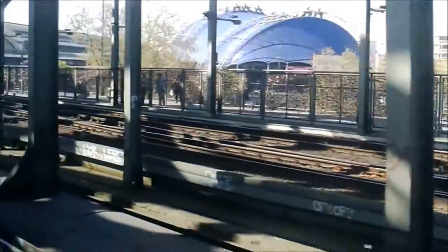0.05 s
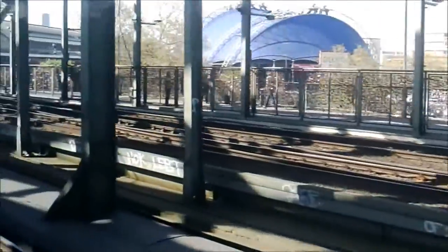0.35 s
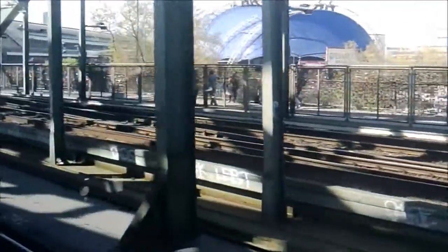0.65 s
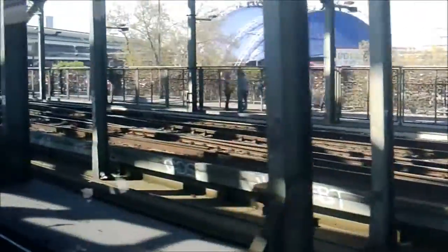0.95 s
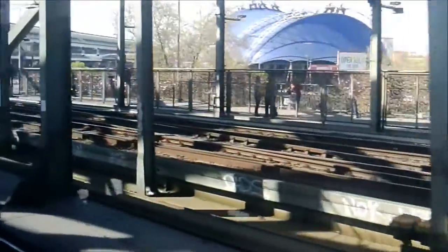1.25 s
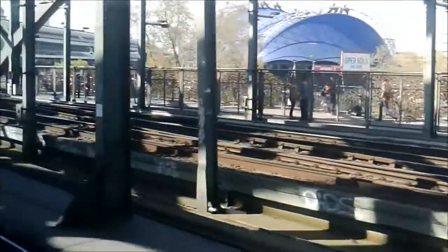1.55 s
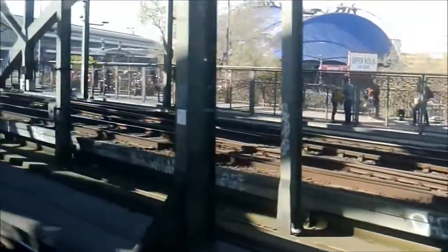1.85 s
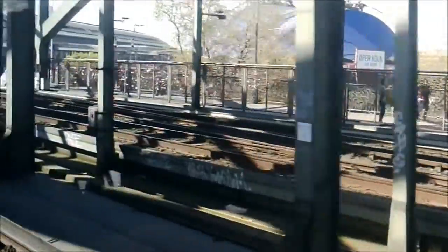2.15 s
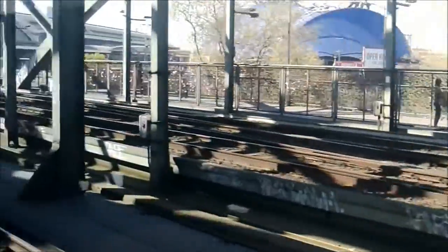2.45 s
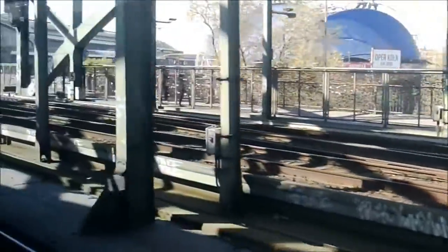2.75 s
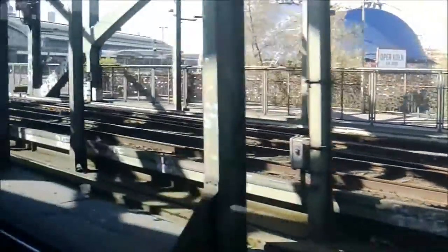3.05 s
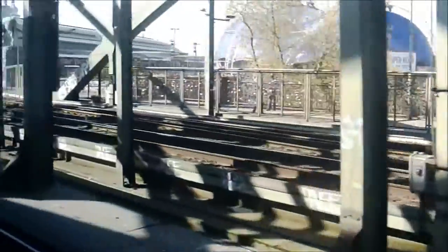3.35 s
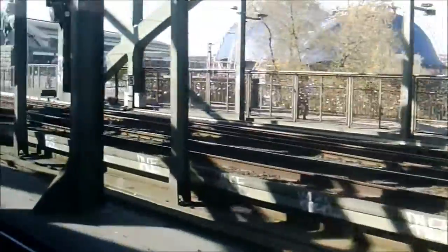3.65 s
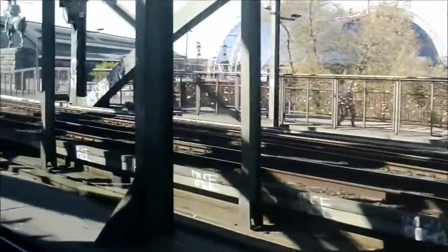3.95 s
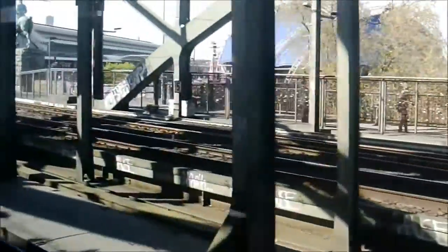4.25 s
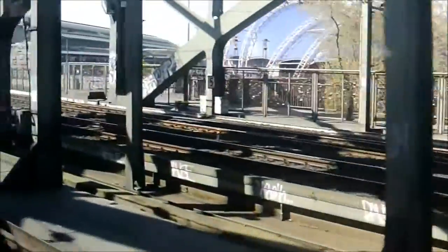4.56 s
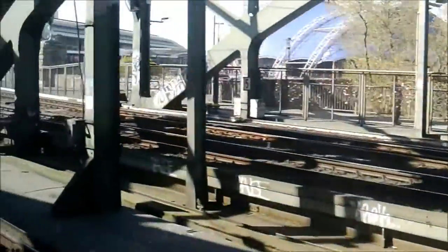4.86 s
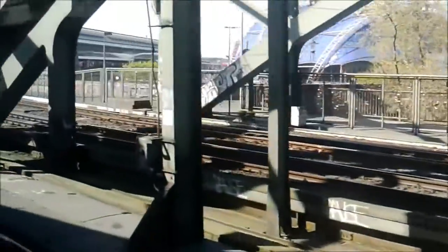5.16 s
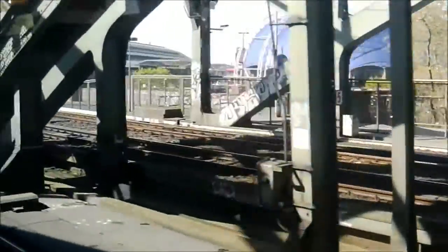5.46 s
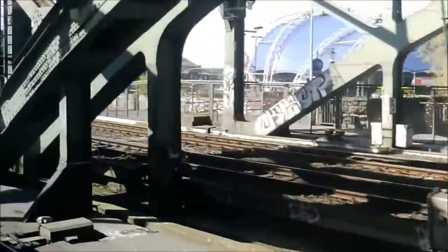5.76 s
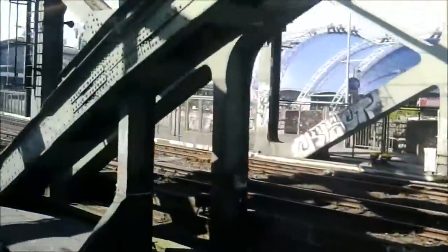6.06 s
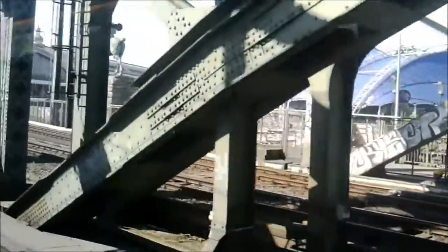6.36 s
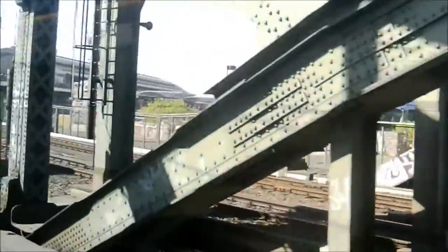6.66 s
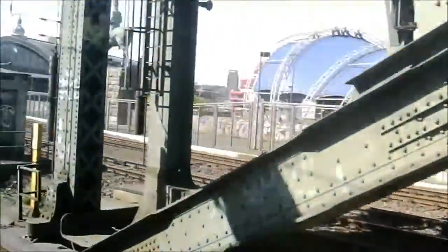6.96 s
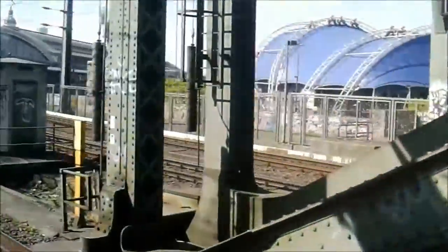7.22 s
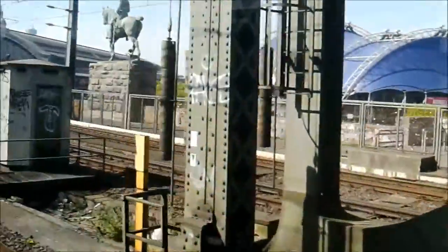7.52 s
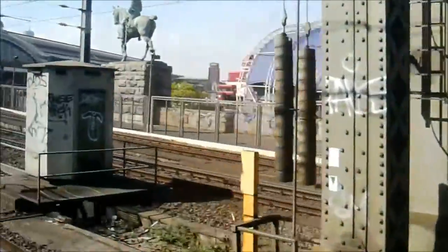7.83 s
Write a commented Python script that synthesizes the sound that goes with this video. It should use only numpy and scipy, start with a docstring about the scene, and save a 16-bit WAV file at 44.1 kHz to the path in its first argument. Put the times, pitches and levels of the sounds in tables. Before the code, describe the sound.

Inside a closed train carriage crossing a steel bridge, wheels rumble and thud under a steady drone, with faint ticks.

```python
"""A train rolls over a steel truss bridge, heard inside a closed carriage. From the start the wheels rumble
through the floor, two machines drone and beat, and thin converter and fan tones sing under a high whine.
From 1.5 s the bogies jolt over deck joints and the drone lifts a little; tiny squeaks and dry clicks
follow, and the fan sinks slightly. Air puffs softly after 4 s and a loose fitting rattles after 5 s.
The heaviest jolts land between 6 and 6.5 s, air spits just after them, and the train rolls on."""
import sys
import numpy as np
from scipy import signal
from scipy.fft import rfft, irfft, next_fast_len
from scipy.io import wavfile

SR = 44100
rng = np.random.default_rng(int(sys.argv[2]) if len(sys.argv) > 2 else 0)


def wav_record(signal):
    """Record a signal, one row per channel, as 16-bit PCM in the file named by sys.argv[1]."""
    frames = np.transpose(np.atleast_2d(signal))
    bounded = np.clip(frames, -1, 1)
    # unit amplitude maps onto the largest positive 16-bit level
    quanta = np.round(bounded * 32767).astype(np.int16)
    wavfile.write(sys.argv[1], SR, quanta)


N = 347949
TIME = np.arange(N) / SR


def from_db(db):
    """Decibels to gain."""
    return 10 ** (np.asarray(db) / 20)


def rms_one(x):
    """Scale to unit rms."""
    return x / np.sqrt(np.mean(x ** 2) + 1e-20)


def automation(rows):
    """One curve per value column of (time, values...) breakpoints, sample by sample."""
    times, *columns = np.transpose(rows)
    return [np.interp(TIME, times, column) for column in columns]


def drift(rate):
    """Smooth random modulation with spread 1, changing about rate times a second."""
    step, run_in = 40, 2000
    pole = np.exp(-2 * step * np.pi * rate / SR)
    white = rng.standard_normal(N // step + run_in + 2)
    slow = signal.lfilter([1], [1, -2 * pole, pole * pole], white)[run_in:]
    return np.interp(np.arange(N) / step, np.arange(len(slow)), rms_one(slow))


def butter(x, hz, kind, order=2):
    """Causal Butterworth filter."""
    return signal.sosfilt(signal.butter(order, hz, kind, fs=SR, output="sos"), x)


def noise(spectrum, low_hz=0, high_hz=SR):
    """A band of noise coloured by (frequency [Hz], density [dB per Hz]) points."""
    size = next_fast_len(N)
    hz = np.maximum(np.arange(size // 2 + 1) * SR / size, 1)
    points_hz, level_db = np.transpose(spectrum)
    gain = from_db(np.interp(np.log(hz), np.log(points_hz), level_db))
    in_band = (hz >= low_hz) & (hz < high_hz)
    return irfft(rfft(rng.standard_normal(size)) * gain * in_band, size)[:N] * np.sqrt(SR / 2)


def tone(hz):
    """A sine of rms 1 on a steady or moving pitch."""
    return np.sqrt(2) * np.sin(2 * np.pi * (np.cumsum(hz * np.ones(N)) / SR + rng.random()))


def resonance(x, hz, width_hz):
    """Two-pole resonance with unity gain at its peak."""
    radius = np.exp(-np.pi * width_hz / SR)
    feedback = [1, -2 * radius * np.cos(2 * np.pi * hz / SR), radius ** 2]
    return signal.lfilter(np.array([1, 0, -1]) * (1 - radius ** 2) / 2, feedback, x)


def swell(level_db, depth, trim_db, flutter_db, rate):
    """Gain that rides a level curve about its median, with flutter from uneven rail at the given rate."""
    return from_db(depth * (level_db - np.median(level_db)) + trim_db + flutter_db * drift(rate))


def rolling():
    """Rough wheels on rough rail shake body, floor and bridge deck; little treble gets past the glass."""
    # swells along the track: (time [s], wheel rumble [dB], deck roar [dB], rail hiss [dB])
    running = [(0.0, -26, -36.5, -55), (0.6, -26.5, -39.5, -56.5), (1.3, -27.5, -37.5, -56.5),
               (1.9, -24.0, -37, -56.5), (2.45, -25, -38.5, -56), (2.9, -22, -36, -55),
               (3.6, -23.5, -36.5, -54.5), (4.1, -24, -36.0, -53.5), (4.6, -27, -37, -55.5),
               (5.0, -26.5, -38, -56), (5.3, -24.5, -37.5, -55.5), (5.85, -25.5, -35.5, -56),
               (6.2, -20, -33, -54), (6.8, -27, -36, -54.5), (7.1, -24, -35.5, -53.5),
               (7.89, -24.0, -36.0, -54.5)]
    # wheels and bridge through the floor: (frequency [Hz], density [dB per Hz])
    rumble = [(10, -33.5), (20, -40), (42, -38), (75, -44.5), (130, -48.5), (165, -54.5), (230, -59.5),
              (320, -64.5), (420, -72.5), (620, -76.5), (950, -86)]
    # rolling hiss through the windows, with the ventilation: (frequency [Hz], density [dB per Hz])
    hiss = [(1400, -87), (2100, -90.5), (3100, -93), (4700, -94), (6800, -98.5), (11500, -100.1),
            (14800, -101.6)]
    wheel_db, deck_db, rail_db = automation(running)
    girder_db = (deck_db + rail_db) / 2
    sway = noise(rumble, 1.1, 50) * swell(wheel_db, 0.45, trim_db=0.4, flutter_db=2.0, rate=3)
    bogie = noise(rumble, 50, 66) * from_db(-2.0)
    wheels = noise(rumble, 66, 220) * swell(wheel_db, 0.83, trim_db=0.53, flutter_db=0.54, rate=11)
    deck = noise(rumble, 220, 680) * swell(deck_db, 1.0, trim_db=-1.6, flutter_db=1.86, rate=13)
    girders = noise(rumble, 680, 1100) * swell(girder_db, 0.57, trim_db=-0.1, flutter_db=1.16, rate=28)
    rail = noise(hiss, 1100, 6300) * swell(rail_db, 0.88, trim_db=-1.03, flutter_db=0.76, rate=25)
    air = noise(hiss, 6300) * swell(rail_db, 0.5, trim_db=-0.2, flutter_db=0.4, rate=12)
    return sway + bogie + wheels + deck + girders + rail + air


def jolts(attack_s=0.0067):
    """The bogies hit joints in the deck: each gives a dull shudder of the body and a boom of the floor."""
    # deck joints: (time [s], shudder level [dB], decay [s], boom level [dB])
    joints = [(1.541, -42, 0.06, -24.5), (1.87, -44.5, 0.06, -31), (1.97, -54, .05, -17),
              (2.41, -47.5, 0.045, -34), (2.97, -45.5, .05, -29), (3.49, -43, 0.039, -18),
              (4.27, -41.5, .045, -30), (4.79, -40, 0.05, -36), (5.62, -45, 0.049, -22.5),
              (6.019, -36.5, 0.08, -24), (6.42, -36, 0.027, -12.5), (7.06, -45, .04, -30),
              (7.699, -43, .05, -34)]
    # dark colour of a jolt: (frequency [Hz], relative density [dB per Hz])
    colour = [(100, 7), (330, -5), (600, -13.5), (1500, -28), (4000, -39)]
    shudder = boom = 0
    for start, shudder_db, decay, boom_db in joints:
        age = np.maximum(TIME - start, 0)
        envelope = np.minimum(age / attack_s, 1) * np.exp(-age / decay)
        shudder += from_db(shudder_db) * envelope
        boom += from_db(boom_db) * envelope
    return shudder * rms_one(noise(colour, 200, 6000)) + boom * rms_one(noise(colour, 70, 160))


def drone(twin_hz=55.72, twin_db=-16.5, in_step_s=4.92):
    """A machine under the floor hums and throbs against a slower twin; its overtones add a buzz."""
    # machine level rides: (time [s], hum level [dB], buzz level [dB])
    levels = [(0.0, -11.5, -33.5), (1.5, -11, -35.5), (2.1, -11, -31), (3.1, -9.5, -34.5),
              (3.7, -10.5, -30.5), (6.0, -10.0, -31.5), (7.89, -8, -30)]
    # the machine speeds up a little, once: (time [s], pitch [Hz])
    pitch = [(0, 57.12), (1.6, 57.12), (1.8, 57.61), (7.89, 57.62)]
    # overtones: (harmonic number, level re buzz [dB], waver [dB])
    overtones = [(2, -7, 2), (3, -1.5, 0.93), (4, -14, 0.2), (5, -15, 3)]
    hum_db, buzz_db = automation(levels)
    hz, = automation(pitch)
    turns = np.cumsum(hz * (1 + 0.00031 * drift(4.2))) / SR
    # both machines crest together at in_step_s
    phase = 2 * np.pi * (turns - np.interp(in_step_s, TIME, turns))
    twin = from_db(twin_db) * np.cos(2 * np.pi * twin_hz * (TIME - in_step_s))
    hum = (np.cos(phase) + twin) * from_db(hum_db - 3.0 + 0.88 * drift(6.2))
    # the overtones crest with the fundamental, giving a pointed wave
    buzz = sum(np.cos(round(harmonic) * phase) * from_db(buzz_db + db + waver_db * drift(2.7))
               for harmonic, db, waver_db in overtones)
    fade_in = np.minimum(turns, 1)
    return np.sqrt(2) * (hum + buzz) * fade_in


def converter(hz=700, octave_db=-67.0):
    """The traction converter sings a clean switching tone with a fluttering octave."""
    # level ride of the switching tone: (time [s], level [dB])
    levels = [(0.0, -53.5), (0.8, -50), (1.2, -48), (1.4, -53.5), (1.8, -53), (2.1, -48), (2.85, -52.5),
              (3.3, -48.5), (3.8, -48.5), (4.15, -54.5), (4.7, -51), (5.2, -55), (6.0, -56), (6.9, -58),
              (7.89, -54)]
    level_db, = automation(levels)
    pure = tone(hz) * from_db(level_db - 1 + 0.97 * drift(8.7))
    octave = tone(2 * hz) * from_db(octave_db + 2.4 * drift(17))
    sidebands = from_db(octave_db) * tone(2 * hz) * drift(35)
    return pure + octave + sidebands


def whine(carrier_hz=8653.88, flip_hz=66.061, first_flip_s=0.0009):
    """A high electrical carrier flips polarity at a steady rate; each flip ticks, so it buzzes."""
    polarity = 1 - 2 * (np.floor((TIME - first_flip_s) * flip_hz) % 2)
    level_db = -46 + np.interp(TIME, [2, 3.2], [-0.7, 0]) + 0.27 * drift(25)
    return from_db(level_db) * rms_one(butter(tone(carrier_hz) * polarity, 8600, "low"))


def rattle(bounce_s=0.0044, bounce_db=-1, attack_s=0.00033, decay_s=0.0038, grit_db=2, crest_db=3):
    """A loose fitting taps, rebounds and rings briefly, in even runs that are strongest mid-way."""
    # runs of taps: (start [s], tap count, spacing [s], drive level [dB])
    runs = [(5.098, 6, .0668, -35.5), (5.565, 3, .0185, -40.5)]
    # ring of the fitting: (frequency [Hz], bandwidth [Hz], gain [dB])
    modes = [(2340, 470, -12), (3080, 140, -8), (3770, 460, -8), (4620, 140, 3), (5200, 400, -4),
             (5640, 250, -2.5), (6040, 250, -6.5)]
    age = TIME[:SR // 20]
    touch = np.exp(-age / decay_s) * (1 - np.exp(-age / attack_s))
    force = np.zeros(N)
    for first, count, spacing, run_db in runs:
        for k in range(count):
            tap_s = first + k * spacing
            tap_db = run_db + crest_db * np.sin(np.pi * (k + 0.5) / count)
            for start, touch_db in [(tap_s, tap_db), (tap_s + bounce_s, tap_db + bounce_db)]:
                at = round(start * SR)
                force[at:at + len(touch)] += from_db(touch_db) * touch
    grit = force * rng.standard_normal(N) * from_db(grit_db * drift(300)) + 1e-18
    ring = sum((-1) ** k * from_db(db) * resonance(grit, hz, width)
               for k, (hz, width, db) in enumerate(modes))
    return from_db(9.5) * butter(ring, 6700, "low", order=8)


def clicks():
    """Dry clicks: square pulses with no ring after them."""
    # pulses: (time [s], width [ms], level [dB])
    cues = [(2.614, 0.5, -26.5), (3.916, 0.4, -33), (4.9133, 0.3, -36), (5.9797, 0.51, -20.5),
            (6.439, 1.3, -27.5), (6.442, 1.1, -42), (6.4502, 0.5, -22.5)]
    pulses = sum(from_db(db) * ((TIME >= start) & (TIME < start + width_ms / 1000))
                 for start, width_ms, db in cues)
    return butter(pulses + 1e-18, 150, "high", order=1)


def air_spits():
    """Short, bright puffs of air from the fittings swell and die away."""
    # puffs: (time [s], attack [s], decay [s], level [dB])
    puffs = [(4.15, 0.11, .12, -57), (6.61, 0.0045, .008, -51), (6.666, 0.018, 0.044, -41.5)]
    # colour of the escaping air: (frequency [Hz], relative density [dB per Hz])
    colour = [(1500, -16), (2900, -15), (3800, -3), (4150, -11.5), (5150, -4), (5600, -14), (6000, -4.5),
              (6500, -20), (7200, -37)]
    flow = 0
    for start, attack, decay, db in puffs:
        rise = np.clip((TIME - start) / attack, 0, 1)
        tail = np.exp(-np.maximum(TIME - start - attack, 0) / decay)
        flow += from_db(db) * rise * tail
    return flow * rms_one(noise(colour)) * from_db(1.6 * drift(150))


def fan():
    """A ventilation fan's wavering tones sink together as it slows a little; air whistles in a grille."""
    # the fan slows once: (time [s], relative speed)
    speeds = [(0, 1.011), (2.6, 1.011), (2.9, 1), (7.89, 1)]
    # fan tones at speed 1: (frequency [Hz], level [dB], waver [dB])
    partials = [(449.5, -54.5, 1.5), (506.5, -63.5, -1), (2440, -74.5, 3.5), (4620, -69.5, 2.5),
                (5900, -73, 0.5)]
    # balance of the tones: (time [s], low hum trim [dB], whistle trim [dB])
    balance = [(0, -4, 1.5), (.9, -7.5, 0.5), (1.5, -3, -1.5), (3.1, -1.5, 1.5), (4.6, -2.5, -1.5),
               (5.5, 0.5, 0.5), (6.3, 0, -2), (7.89, 3, -1.5)]
    speed, = automation(speeds)
    hum_db, whistle_db = automation(balance)
    speed = speed * (1 + 0.00039 * drift(2.1))
    tones = 0
    for hz, db, waver_db in partials:
        trim_db = hum_db if hz < 1000 else whistle_db
        tones += tone(hz * speed) * from_db(db + trim_db + waver_db * drift(6.6))
    grille = from_db(-69.0) * rms_one(resonance(rng.standard_normal(N), hz=4580, width_hz=170))
    return tones + grille


def squeaks():
    """Panels rub and give faint, scratchy chirps."""
    # chirps: (time [s], length [s], start pitch [Hz], end pitch [Hz], level [dB])
    rubs = [(2.095, .07, 4920, 5220, -58), (2.81, .13, 5890, 5910, -64), (3.17, .13, 4570, 4540, -63),
            (7.085, .06, 4950, 5220, -60)]
    chirps = 0
    for start, length, start_hz, end_hz, db in rubs:
        progress = np.clip((TIME - start) / length, 0, 1)
        hz = start_hz + (end_hz - start_hz) * progress + 55 * drift(150)
        arch = np.sqrt(4 * progress * (1 - progress))
        chirps += from_db(db - 2.5 + 2 * drift(80)) * arch * tone(hz)
    return chirps


def scene():
    """The mono mix, heard from a window seat."""
    bed = rolling() + jolts() + drone() + converter() + fan()
    return (bed + whine() + rattle() + air_spits() + squeaks() + clicks())[None]


def record(dry):
    """A steep low-pass takes off the very top."""
    cutoff_hz = 15350
    return signal.sosfilt(signal.ellip(10, 0.1, 80, cutoff_hz, fs=SR, output="sos"), dry)


dry = scene()
out = record(dry)
wav_record(out)
```